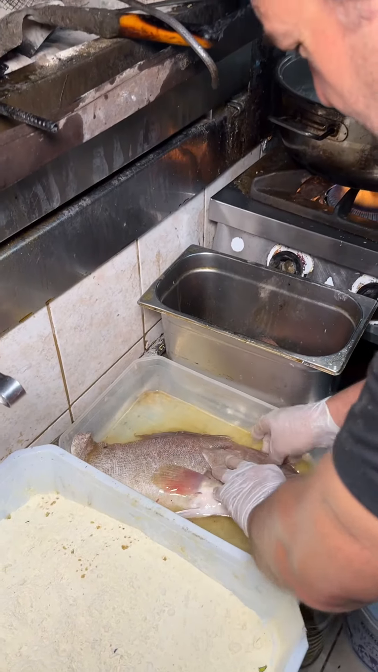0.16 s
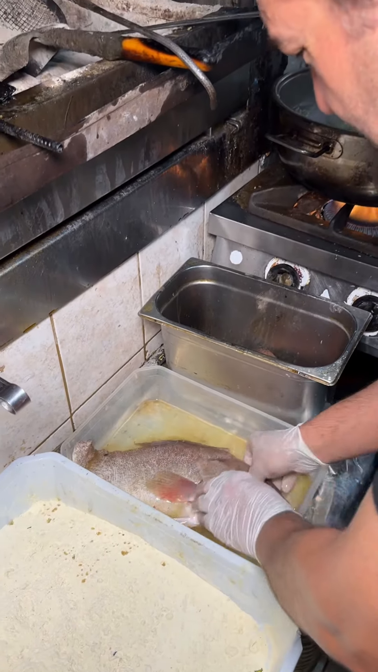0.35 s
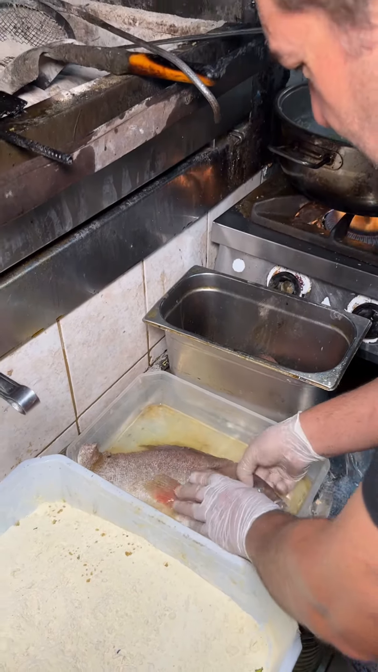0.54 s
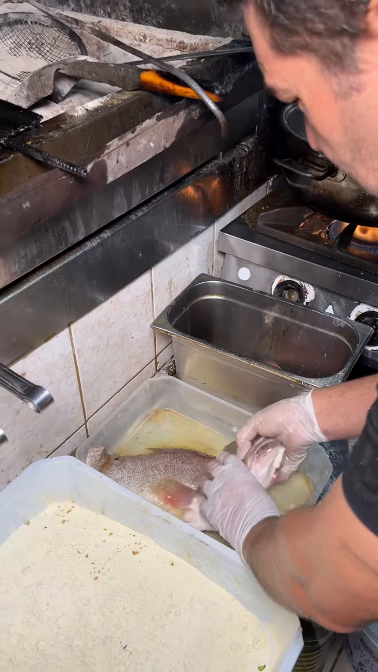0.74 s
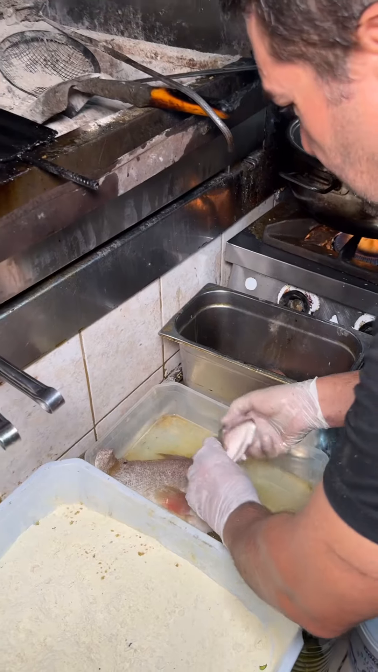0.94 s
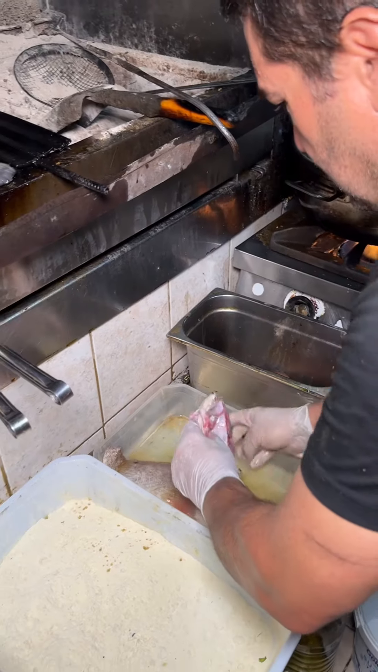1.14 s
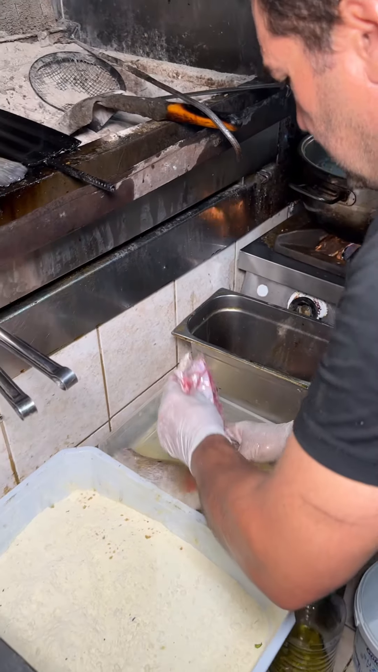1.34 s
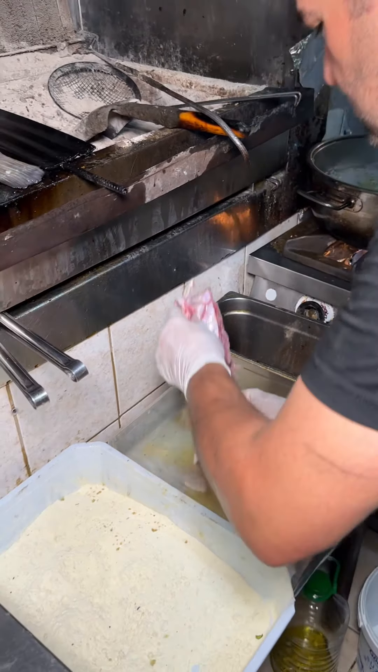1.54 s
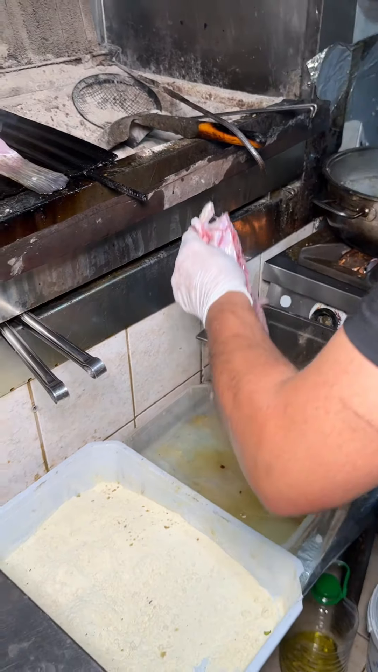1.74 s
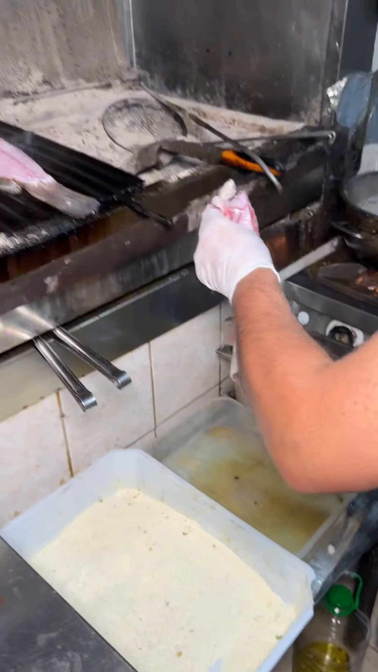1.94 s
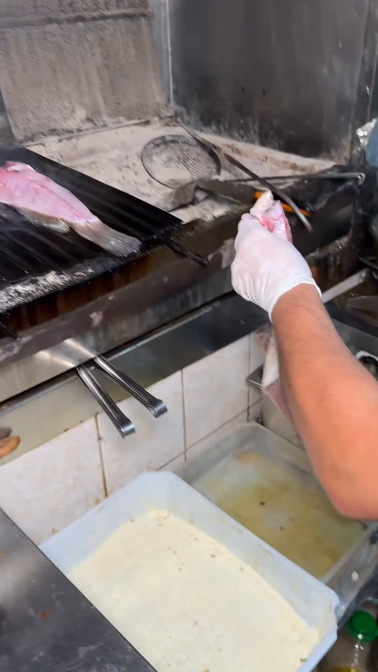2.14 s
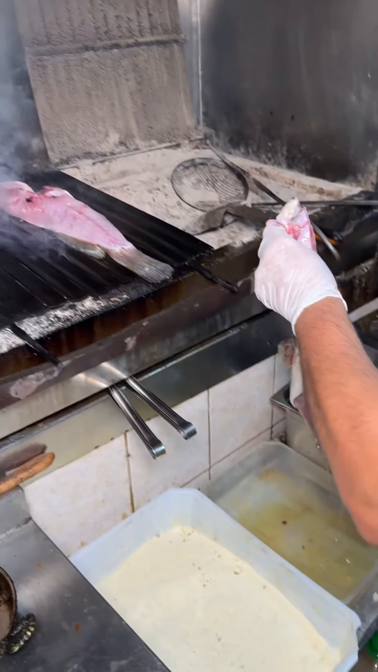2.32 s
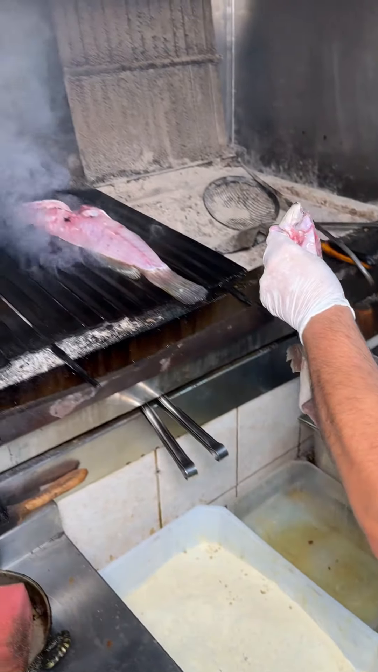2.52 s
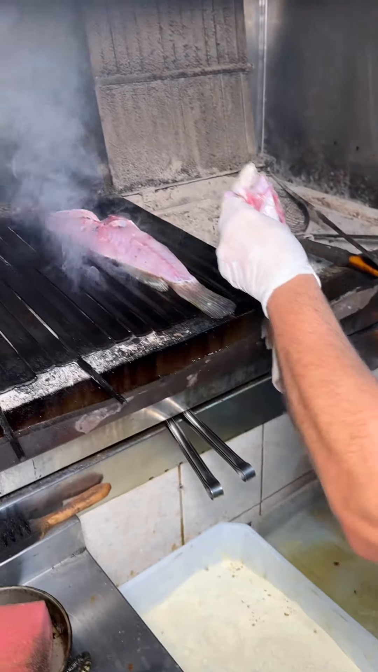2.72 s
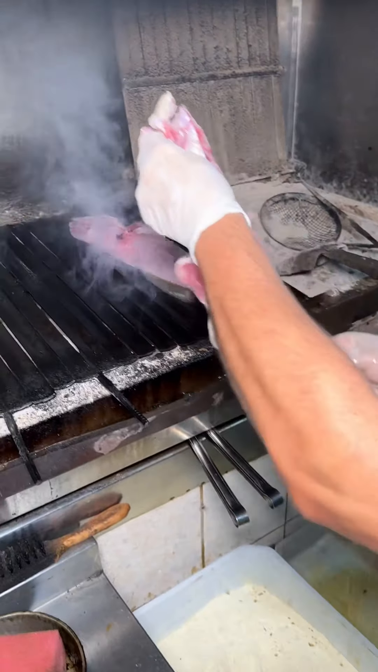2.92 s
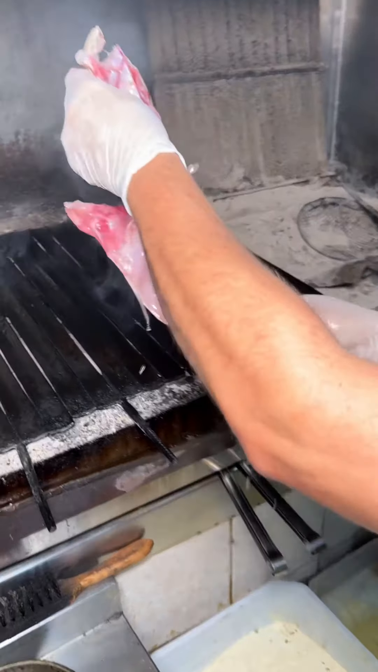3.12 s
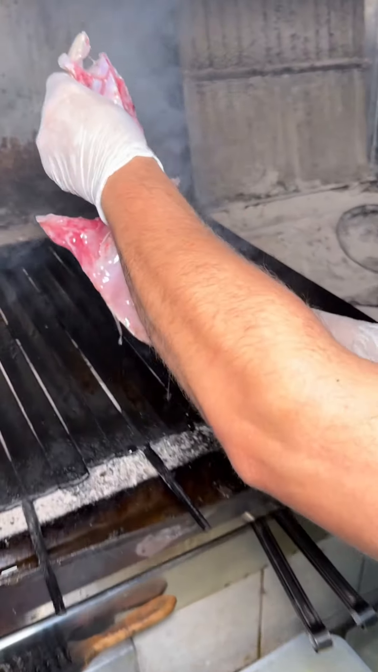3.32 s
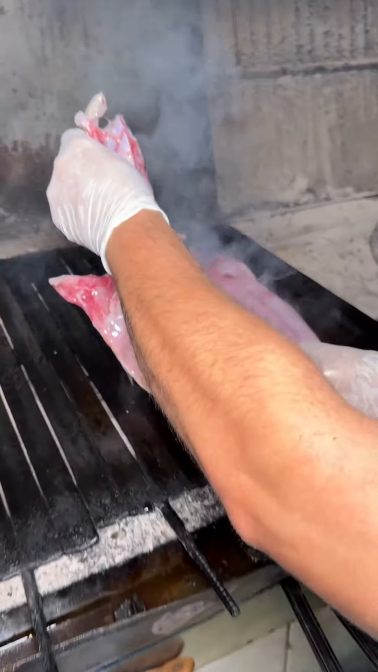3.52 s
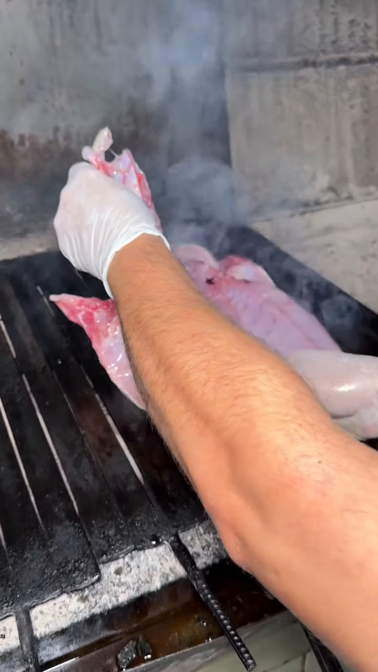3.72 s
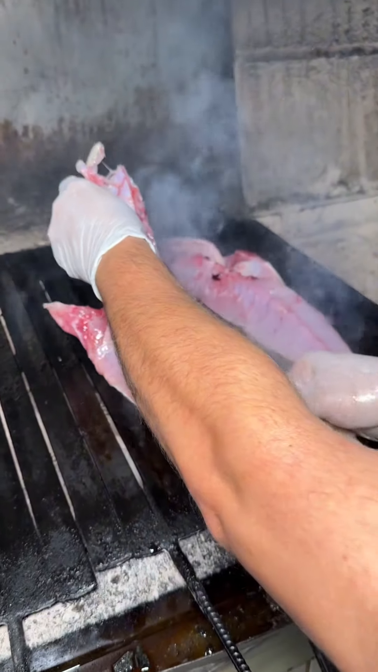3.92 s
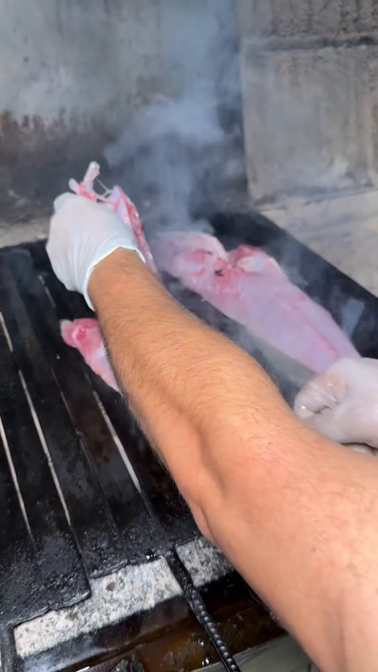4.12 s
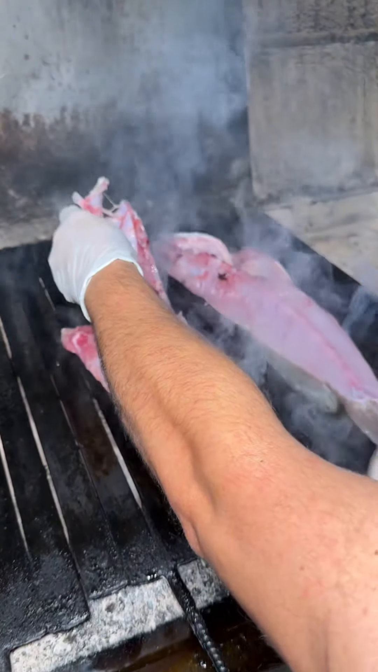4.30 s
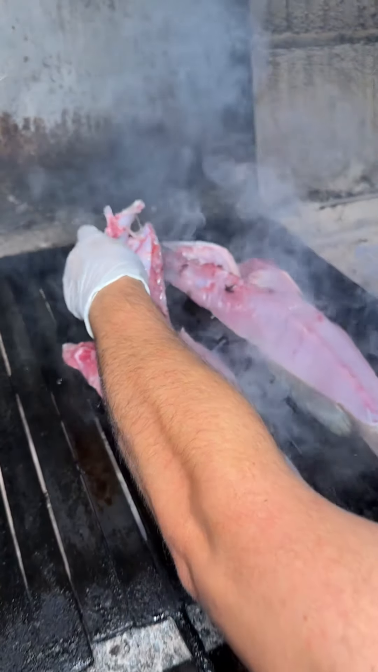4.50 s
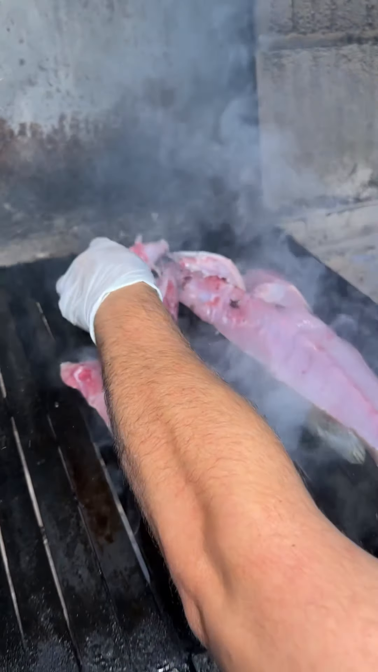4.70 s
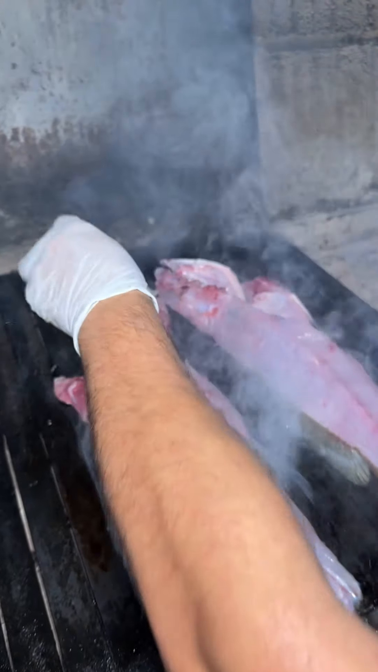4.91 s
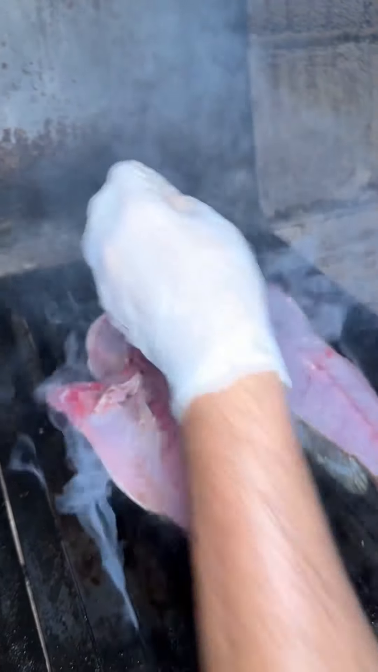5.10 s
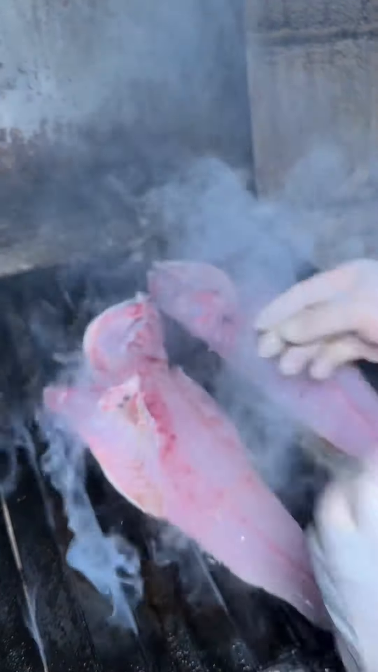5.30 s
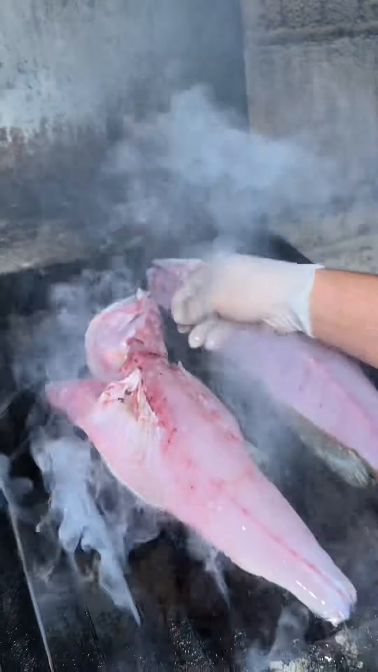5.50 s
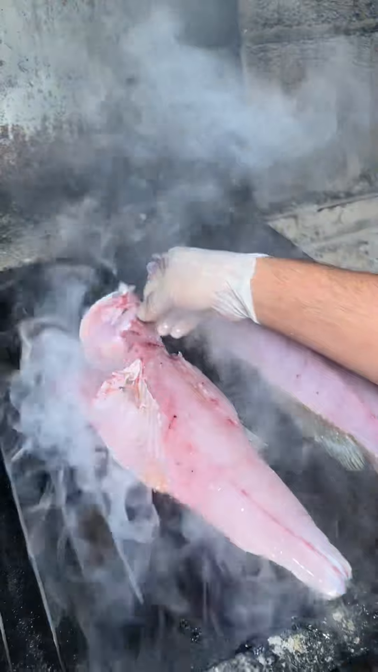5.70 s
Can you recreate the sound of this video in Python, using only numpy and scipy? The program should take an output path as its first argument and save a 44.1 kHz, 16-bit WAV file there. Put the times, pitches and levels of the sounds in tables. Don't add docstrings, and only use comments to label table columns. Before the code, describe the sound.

Low fan hum, crackling fat and fading dull floor thuds, a small tong clink, then a surging steamy sizzle as another fish touches hot bars.

```python
import sys
import numpy as np
from scipy import signal
from scipy.fft import rfft, irfft
from scipy.io import wavfile
from scipy.ndimage import uniform_filter1d

SR = 44100
rng = np.random.default_rng(int(sys.argv[2]) if len(sys.argv) > 2 else 0)


def makeup_ratio(level_db):
    decades = np.asarray(level_db, float) / 20
    return 10 ** decades


def waveform_to_disk(signal):
    frames = np.transpose(np.atleast_2d(signal))
    scaled = np.clip(frames, -1, 1) * 32767
    samples = np.round(scaled).astype(np.int16)
    wavfile.write(sys.argv[1], SR, samples)


N = 253575

# time_s, level_db
HEAT = [(0.0, -42), (0.8, -43), (1.7, -43), (2.5, -42.5), (3.25, -42.5), (3.45, -39.5), (3.63, -32.5),
        (3.83, -28), (4.0, -27), (4.3, -26.5), (4.6, -26), (4.85, -26.5), (5.16, -26.5), (5.45, -25.5),
        (5.75, -24)]
# start_s, length_s, fizz_db, steam_db
FLARES = [(0.0, 0.031, -38.5, -58), (0.325, 0.025, -38, -44), (0.511, 0.019, -37, -48),
          (0.627, 0.17, -39.5, -59), (0.876, 0.12, -44.5, -65), (1.213, 0.045, -35.5, -58),
          (1.462, 0.012, -39.5, -47.5), (1.577, 0.078, -42.5, -58), (1.72, 0.016, -54, -64),
          (1.855, 0.079, -37.5, -56), (1.973, 0.012, -44, -50.5), (2.385, 0.051, -38.5, -49),
          (2.499, .03, -38, -54), (2.865, 0.032, -40.5, -49), (2.976, 0.02, -47, -56),
          (3.131, 0.039, -38.5, -49), (3.72, .005, -44, -44), (4.326, 0.071, -29, -37.5),
          (4.48, 0.017, -37, -40), (4.615, 0.037, -27.5, -38), (5.005, 0.09, -35, -35),
          (4.109, .05, -29, -37), (5.202, .25, -34, -36), (5.574, 0.03, -33, -37), (2.78, 0.045, -44, -52),
          (0.98, 0.075, -46, -52), (3.334, 0.038, -47, -65)]
# freq_hz, density_db_per_hz
ROAR_SPECTRUM = [(250, -16.5), (600, -9.5), (1200, -10), (1700, -7), (2500, 0.5), (3200, -2.5),
                 (4200, -0.5), (5000, -9), (6500, -20), (9000, -44)]
# freq_hz, density_db_per_hz
FIZZ_SPECTRUM = [(3000, -33), (4500, -8), (5500, -1), (6200, 2), (8000, -1.5), (9500, -13), (12000, -11)]
# freq_hz, density_db_per_hz
MIST_SPECTRUM = [(6000, -40), (8500, -9), (9800, -3), (11000, 0), (15600, 0)]
# time_s, level_db
FAN_BLADE = [(0.0, -39.5), (1.4, -40.5), (1.65, -38), (2.0, -39.5), (2.8, -39.5), (3.92, -34.5), (4.1, -38),
             (4.45, -34.5), (4.6, -38.5), (5.17, -32.5), (5.33, -36.5), (5.6, -33.5), (5.75, -32.5)]
# freq_hz, width_hz, level_db
DUCT_MODES = [(130.8, 8.1, -7.5), (190, 48, -2), (235.2, 11, -2), (392, 3.8, -11)]
# freq_hz, density_db_per_hz
AIR_SPECTRUM = [(18, -32), (30, -1), (106, -6), (150, -14), (234, -2.5), (333, -17.5), (386, -10),
                (447, -16), (684, -16.5), (1210, -25.5), (2500, -51), (3250, -51), (5500, -120)]
# start_s, hold_s, boom_db, scuff_db, core_hz
STEPS = [(0.0, 0.031, -35, -42.5, 180), (0.406, 0.082, -23, -34, 182.1), (0.75, 0.075, -26.5, -37, 180.7),
         (1.135, .065, -26, -42.5, 175.6), (1.23, 0.09, -35, -57.5, 151.7), (1.58, .06, -33.5, -49, 190),
         (1.965, 0.128, -36, -50.5, 203.8), (2.24, 0.039, -36.5, -47, 226), (2.45, 0.032, -38.5, -52, 189),
         (3.415, .07, -40, -46, 167), (4.199, 0.66, -45.5, -48.5, 228.6), (4.517, .025, -42, -60, 233),
         (4.7, 0.066, -35.5, -59, 133), (5.57, 0.043, -45, -35, 224)]
# freq_hz, width_hz, level_db
FLOORBOARD_MODES = [(138.7, 13, -1.5), (177.3, 29, 0), (224, 72, -3)]
# time_s, peak_db
TICKS = [(0.0484, -14), (0.0588, -14), (0.247, -14), (0.2836, -9), (0.3498, -4), (0.416, -11),
         (0.5298, -25), (0.6526, -12), (0.9485, -13), (1.2226, -5), (1.2601, -7.5), (1.8839, -30),
         (2.3822, -8), (2.509, -15), (2.545, -21), (2.5722, -17), (3.1414, -8), (2.36, -17), (2.877, -10),
         (3.0264, -11.5), (3.0839, -12), (3.164, -12), (3.2276, -13), (3.448, -11), (3.5268, -8.5),
         (3.5503, -24), (4.02, -18), (4.5033, -14), (4.707, -15), (4.8499, 2)]
# start_s, peak_db, ring_hz
SPITS = [(5.598, -10.5, 2780), (0.326, -16, 5900), (0.3479, -13, 5940), (0.5326, -17, 5650),
         (2.3592, -21.5, 2840), (0.7886, -18.5, 6460), (0.8891, -18.5, 6350), (1.1736, -20, 6450),
         (1.222, -15, 6040), (1.4099, -19, 5550), (1.6187, -21, 6400), (1.731, -19, 5640),
         (1.878, -32, 7600), (1.973, -16.5, 5760), (2.2742, -18.5, 7300), (2.729, -29, 1600),
         (2.3815, -21.5, 3200), (2.4085, -15, 6400), (2.5058, -18.5, 5660), (2.8597, -14, 4640),
         (2.872, -14, 4260), (2.945, -17, 6660), (2.973, -13.5, 6540), (3.0239, -19.5, 5600),
         (3.7146, -13.5, 2660), (3.1405, -16, 7600), (3.4443, -14, 6500), (3.5203, -16, 6250),
         (3.674, -17, 7740), (4.503, -4.5, 5600)]
# start_s, peak_db, ring_t60_s, bright_modes_db
KNOCKS = [(1.631, -22, 0.044, -18), (2.729, -29, 0.045, -12), (2.86, -18, 0.11, -1),
          (2.866, -21.5, 0.044, -12), (2.872, -20, 0.11, 8), (2.88, -18.5, 0.06, -7),
          (2.891, -21.5, 0.085, 2), (2.766, -25.5, 0.03, -20), (3.716, -13, 0.033, -37),
          (4.775, -16.5, 0.096, -15), (5.6, -22, 0.07, -10)]
# freq_hz, level_db
TONGS_MODES = [(264, -4.5), (560, -6), (880, -5), (1920, -11), (2880, -11), (4030, -3.5), (4300, -18),
               (4580, -1.5), (4800, -16), (5520, -11.5), (6300, -3)]
# freq_hz, likeness_0_to_1
PORT_LIKENESS = [(120, 1), (300, .9), (700, .62), (1250, .72), (1650, .9), (2250, .9), (3200, .22),
                 (4200, .66), (4900, .3), (5400, .87), (8000, .88), (9000, .6), (10300, .85), (11000, .93),
                 (13300, .93), (15600, .66)]
# freq_hz, lead_rad
PORT_LEAD = [(2500, 0), (4570, .5), (5170, 0), (7500, -.15), (8500, -.45), (9100, -1.7), (9800, -2.8),
             (10300, -3.14), (13300, -3.14), (13900, -3.75), (15600, -4.8)]
# time_s, gain_db
LIMITER_DIP = [
    (4.7072, 0),
    (4.7082, -7),
    (4.7165, -7),
    (4.718, -3),
    (4.728, 0),
]

STEAM_LAG_S, STEAM_REST_DB, STEAM_SLOPE = 0.1, -50, 1
HEAT_REST_DB, MIST_DB, MIST_SLOPE = -43, -1, 0.092
FLARE_RISE_S, FLARE_T60_S = 0.0065, 0.11
BLADE_HZ, MAINS_HZ, AIR_DB = 45.6, 99.9, -39
MAINS_DB, MAINS_FADE_DB, MAINS_FADE_S = -39.5, -3.5, (4.2, 4.9)
STEP_RISE_S, STEP_FALL_T60_S, SCUFF_T60_S = 0.011, 0.088, 0.32
REBOUND_DB, REBOUND_T60_S, REBOUND_PITCH, SAG_PER_S = -10, 0.8, 0.86, 0.64
SPRAY_T60_S, SPRAY_MIST_DB = 0.14, -3
BOIL_S, BOIL_RISE_S, BOIL_HOLD_S, BOIL_T60_S, BOIL_DB = 4.13, 0.43, 0.35, 0.93, -38.5


def evened(x):
    return x / np.sqrt(np.mean(x ** 2) + 1e-20)


def read(points, hz):
    f, value = np.transpose(points)
    return np.interp(np.log(hz + 1), np.log(f + 1), value)


def columns(rows, t):
    s, *values = np.transpose(rows)
    return [np.interp(t, s, v) for v in values]


def add(mix, s, sound):
    part = mix[round(s * SR):][:len(sound)]
    part += sound[:len(part)]


def colour(x, gain):
    return irfft(rfft(x) * gain(np.fft.rfftfreq(x.shape[-1], 1 / SR)), x.shape[-1])


def shaped(x, spectrum):
    return evened(colour(x, lambda f: makeup_ratio(read(spectrum, f))))


def resonate(x, hz, width_hz):
    return colour(x, lambda f: 1 / (1 + (2 * (f - hz) / width_hz) ** 2))


def resonant_noise(modes):
    return sum(makeup_ratio(db) * evened(resonate(rng.standard_normal(N), hz, w)) for hz, w, db in modes)


def wander(rate_hz):
    return evened(colour(rng.standard_normal(N), lambda f: np.exp(-(f / rate_hz) ** 2)))


def tone(hz):
    return np.sin(2 * np.pi * np.cumsum(hz) / SR)


def swell(t, s, rise_s, hold_s, t60_s):
    rise = np.clip((t - s) / max(rise_s, .001), 0, 1)
    return rise * makeup_ratio(-60 * np.maximum(t - s - rise_s - hold_s, 0) / max(t60_s, .01))


def fire():
    t = np.arange(N) / SR
    heat_db = columns(HEAT, t)[0]
    late_db = columns(HEAT, t - STEAM_LAG_S)[0]
    fizz_power = makeup_ratio(heat_db) ** 2
    steam_power = makeup_ratio(STEAM_REST_DB + STEAM_SLOPE * (late_db - HEAT_REST_DB)) ** 2
    for s, length_s, fizz_db, steam_db in FLARES:
        shape = swell(t, s, FLARE_RISE_S, length_s, FLARE_T60_S) ** 2
        fizz_power = fizz_power + makeup_ratio(2 * fizz_db) * shape
        steam_power = steam_power + makeup_ratio(2 * steam_db) * shape
    mist_db = MIST_DB + MIST_SLOPE * (heat_db - HEAT_REST_DB)
    return 10 * np.log10(fizz_power), mist_db, 10 * np.log10(steam_power)


def sizzle():
    a, b, patches = rng.standard_normal((N // 64 + 5, 129, 3)).T
    patches = uniform_filter1d(patches, size=10, axis=0)
    patches = evened(uniform_filter1d(patches, size=25, axis=1))
    hiss = signal.istft((a + 1j * b) * makeup_ratio(1.3 * patches), nperseg=256, noverlap=192)[1]
    hiss = evened(hiss[:N])

    bursts = makeup_ratio(5.2 * np.minimum(rng.exponential(1, N), 4)) * (rng.random(N) < 1500 / SR)
    u = np.arange(600) / SR
    kind = rng.integers(0, 12, N)
    shapes = rng.standard_normal((12, len(u))) * (makeup_ratio(-60 * u / 0.0016) + makeup_ratio(-33 - 60 * u / 0.026))
    bubbles = sum(signal.oaconvolve(bursts * (kind == k), shape)[:N] for k, shape in enumerate(shapes))
    bubbles = evened(bubbles)

    heat_db, mist_db, steam_db = fire()
    layers = [(ROAR_SPECTRUM, steam_db + 4.0, -9),
              (FIZZ_SPECTRUM, heat_db + 1.5, -6),
              (MIST_SPECTRUM, heat_db + mist_db + 7.5, -8)]
    out = 0
    for spectrum, level_db, bubbles_db in layers:
        flutter = makeup_ratio(.5 * wander(60) + .45 * wander(18))
        out = out + makeup_ratio(level_db) * shaped(flutter * hiss + makeup_ratio(bubbles_db) * bubbles, spectrum)
    return out


def fan():
    t = np.arange(N) / SR
    blade_db = columns(FAN_BLADE, t)[0]
    mains_db = MAINS_DB + np.interp(t, MAINS_FADE_S, [0, MAINS_FADE_DB]) + 1.2 * wander(3.5)
    blade = tone(BLADE_HZ + 0.47 * wander(2.9)) * makeup_ratio(blade_db + 3.5)
    mains = tone(MAINS_HZ + 0.81 * wander(6.0)) * makeup_ratio(mains_db + 3.5 + 2.2 * wander(9.8))
    air_gain = lambda f: makeup_ratio(read(AIR_SPECTRUM, f)) * (f > 60)
    rush = evened(colour(rng.standard_normal(N), air_gain))
    return blade + mains + makeup_ratio(AIR_DB - 2) * (rush + makeup_ratio(-3) * resonant_noise(DUCT_MODES))


def steps():
    boards = evened(resonant_noise(FLOORBOARD_MODES))
    scuff = evened(resonate(rng.standard_normal(N), 444, 510))
    shake = makeup_ratio(1.5 * wander(30))
    out, u = np.zeros(N), np.arange(round(.9 * SR)) / SR
    for s, hold_s, boom_db, scuff_db, core_hz in STEPS:
        on = slice(round(s * SR), round(s * SR) + len(u))
        v = u[:len(out[on])]
        blow = swell(v, 0, STEP_RISE_S, hold_s, STEP_FALL_T60_S)
        sag = 1 - SAG_PER_S * np.minimum(v, .1)
        release = REBOUND_PITCH + (1 - REBOUND_PITCH) * np.where(v < hold_s, 1, blow)
        core = np.sqrt(2) * tone(core_hz * sag * release) * shake[on]
        rebound = makeup_ratio(REBOUND_DB) * swell(v, 0, STEP_RISE_S, hold_s, REBOUND_T60_S)
        boom = (0.9 * core + 0.35 * boards[on]) * np.maximum(blow, rebound)
        scrape = scuff[on] * swell(v, 0, 0.26 * hold_s, 0.765 * hold_s, SCUFF_T60_S)
        add(out, s, makeup_ratio(boom_db) * boom + makeup_ratio(scuff_db) * scrape)
    return out


def ticks():
    heat_db, mist_db, _ = fire()
    chance_db = 4.0 * np.minimum(rng.exponential(1, N), 2.2)
    train = makeup_ratio(heat_db + mist_db + 15 + chance_db) * (rng.random(N) < 120 / SR)
    for s, db in TICKS:
        train[round(s * SR) - 8] = makeup_ratio(db + 9.5)
    u = np.arange(200) / SR
    ring = sum(g * np.cos(2 * np.pi * hz * u) for hz, g in ((11500, 1), (7000, 0.65), (14500, .5)))
    ring = ring / 2 * makeup_ratio(-60 * u / 0.0016)
    shower = signal.oaconvolve(train * rng.choice([-1., 1.], N), ring)[:N]
    return colour(shower, lambda f: 1 / (1 + (6500 / (f + 1)) ** 4))


def spits():
    out, u = np.zeros(N), np.arange(8192) / SR
    noise = rng.standard_normal((len(SPITS), 2, len(u)))
    decay = makeup_ratio(-60 * u / 0.0076) + makeup_ratio(-12 - 60 * u / SPRAY_T60_S)
    envelope = np.minimum(u / 0.00046, 1) * decay
    for (s, db, hz), (a, b) in zip(SPITS, noise):
        mist = (hz / 6200) ** 2 * makeup_ratio(SPRAY_MIST_DB) * shaped(b, MIST_SPECTRUM)
        spray = evened(resonate(a, hz, 1800)) + mist
        add(out, s, makeup_ratio(db - 5) * spray * envelope)
    return out


def knocks():
    out, u = np.zeros(N), np.arange(8000) / SR
    hz, mode_db = np.transpose(TONGS_MODES)[:, :, None]
    decay_rate = np.where(hz > 3000, 1.5, np.where(hz < 600, .6, 1.2))
    draws = rng.standard_normal((len(KNOCKS), len(TONGS_MODES), 2))
    noise = rng.standard_normal((len(KNOCKS), len(u)))
    for (s, db, t60_s, bright_db), d, puff in zip(KNOCKS, draws, noise):
        ring = makeup_ratio(-60 * u / max(t60_s, .01) * decay_rate + (hz > 3000) * bright_db)
        detuned_hz = hz * (1 + .008 * d[:, 1:])
        modes = makeup_ratio(mode_db + 2.2 * d[:, :1]) * np.sin(2 * np.pi * detuned_hz * u) * ring
        clack = evened(resonate(puff, 690, 1900)) * makeup_ratio(0.5 - 60 * u / 0.019)
        add(out, s, makeup_ratio(db - 10.5) * (modes.sum(0) + clack))
    return out


def boil():
    seethe = evened(resonate(rng.standard_normal(N), 800, 1200)) * makeup_ratio(1.8 * wander(25))
    envelope = swell(np.arange(N) / SR, BOIL_S, BOIL_RISE_S, BOIL_HOLD_S, BOIL_T60_S)
    return makeup_ratio(BOIL_DB) * seethe * envelope


def scene():
    hz = np.fft.rfftfreq(N, 1 / SR)
    direct = rfft(sizzle() + fan() + steps() + ticks() + spits() + knocks() + boil())
    alike = np.clip(read(PORT_LIKENESS, hz), 0, 1)
    turn = np.exp(.5j * read(PORT_LEAD, hz))
    frame = dict(nperseg=512, noverlap=256, window="cosine")
    z = signal.stft(irfft(direct * np.sqrt((1 - alike) / 2), N), **frame)[2]
    z = z * np.exp(2j * np.pi * rng.random(z.shape[::-1]).T)
    apart = rfft(signal.istft(z, **frame)[1][:N]) * np.sqrt(2)
    same = direct * np.sqrt((1 + alike) / 2)
    return irfft(np.array([(same + apart) * turn, (same - apart) / turn]), N)


def top_cut(x):
    return signal.sosfilt(signal.butter(12, 17070, fs=SR, output="sos"), x)


def record(dry):
    ducked = dry * makeup_ratio(columns(LIMITER_DIP, np.arange(N) / SR)[0])
    limited = ducked / (1 + (ducked / .7) ** 6) ** (1 / 6)
    edge = signal.firwin(801, 15730, window=("kaiser", 9), fs=SR)
    mix = signal.oaconvolve(limited, edge[None], "same")
    return top_cut(mix)


dry = scene()
out = record(dry)
waveform_to_disk(out)
```